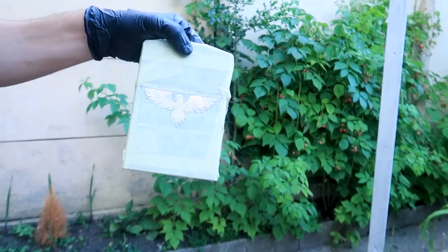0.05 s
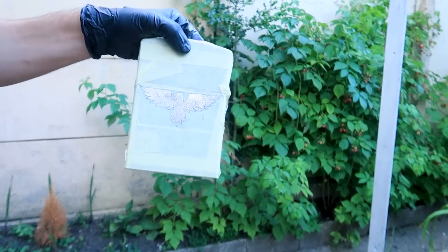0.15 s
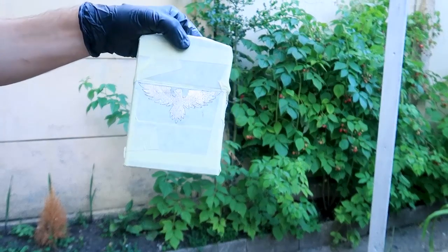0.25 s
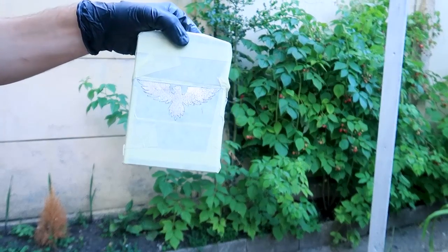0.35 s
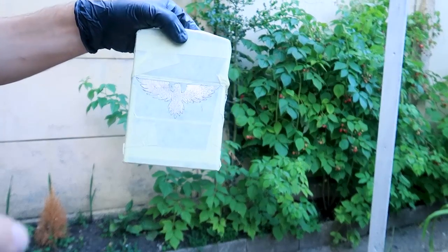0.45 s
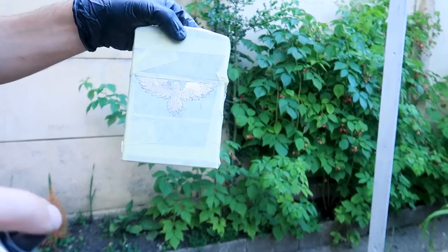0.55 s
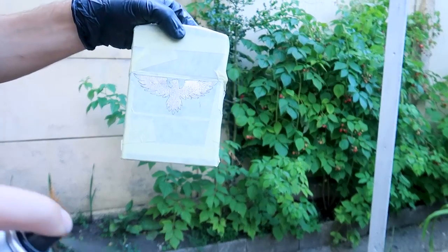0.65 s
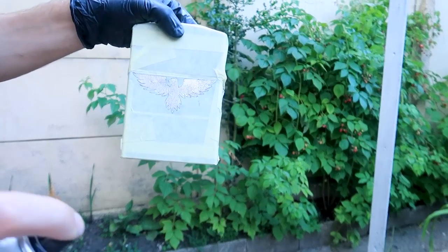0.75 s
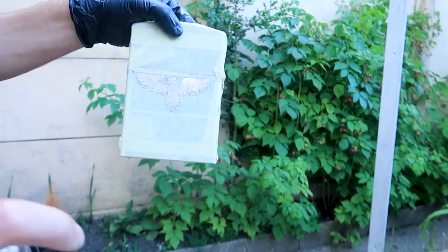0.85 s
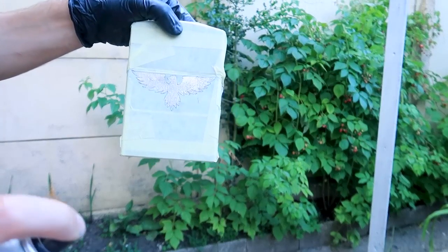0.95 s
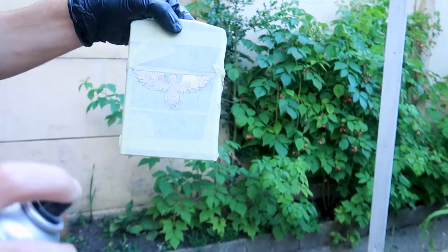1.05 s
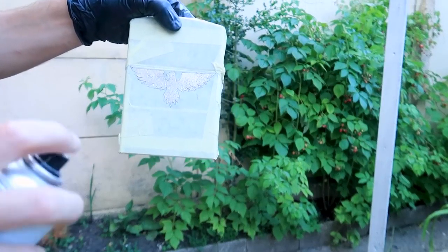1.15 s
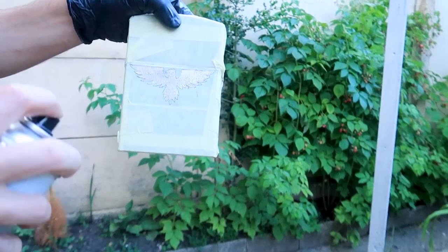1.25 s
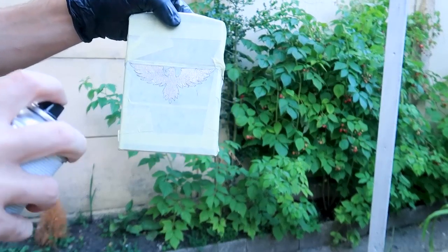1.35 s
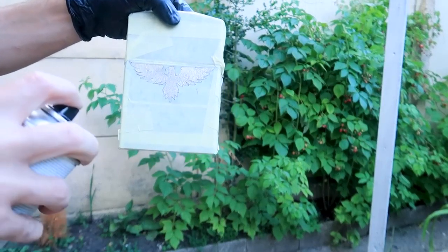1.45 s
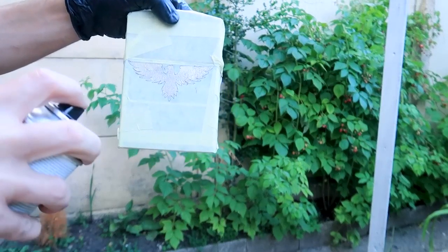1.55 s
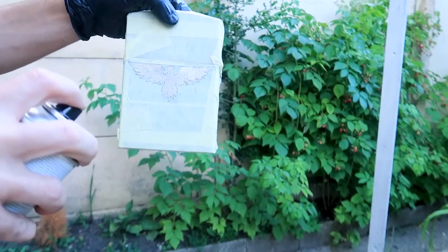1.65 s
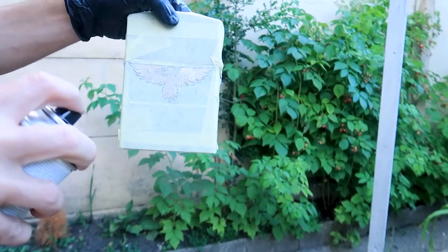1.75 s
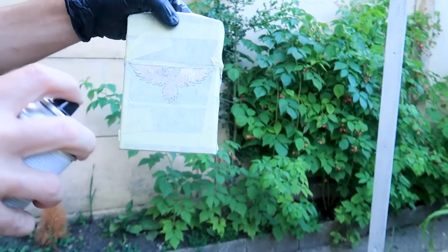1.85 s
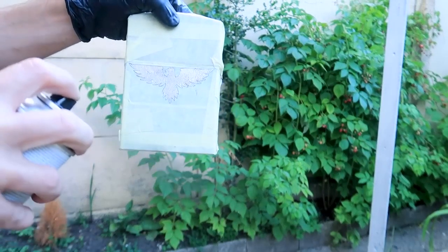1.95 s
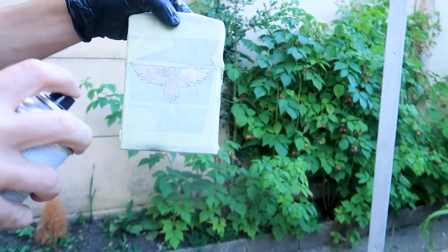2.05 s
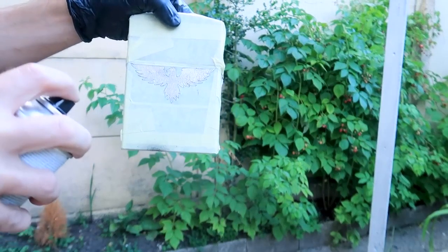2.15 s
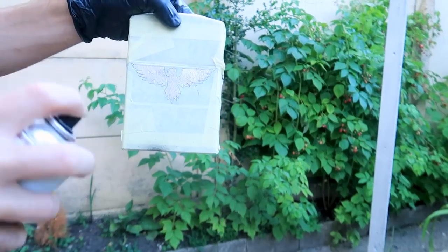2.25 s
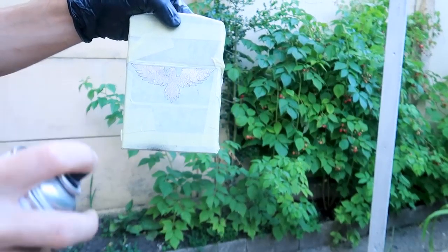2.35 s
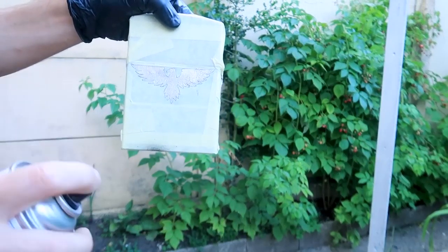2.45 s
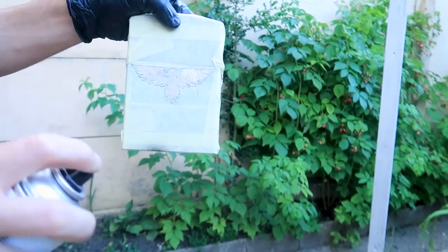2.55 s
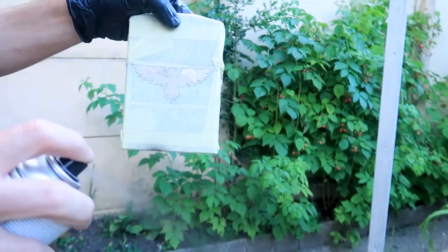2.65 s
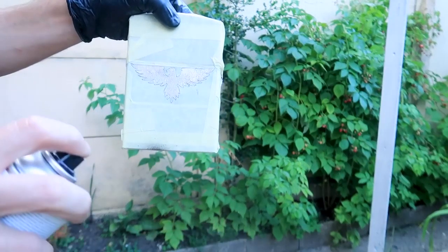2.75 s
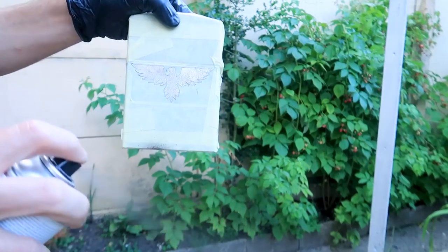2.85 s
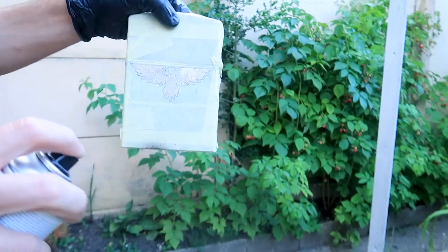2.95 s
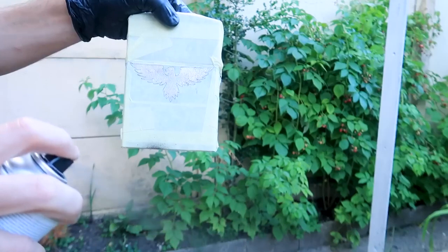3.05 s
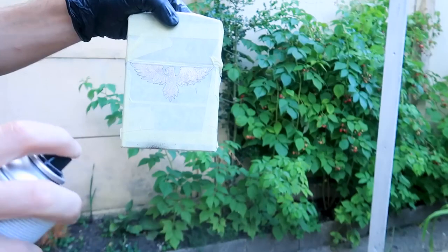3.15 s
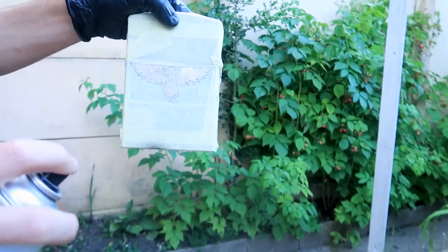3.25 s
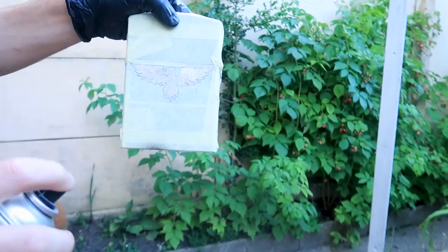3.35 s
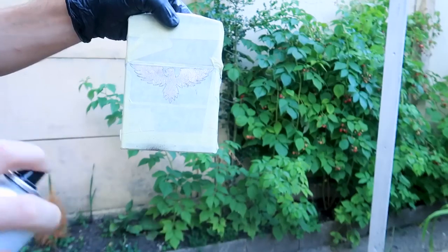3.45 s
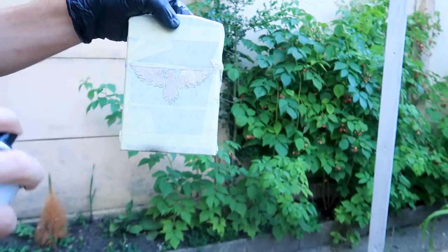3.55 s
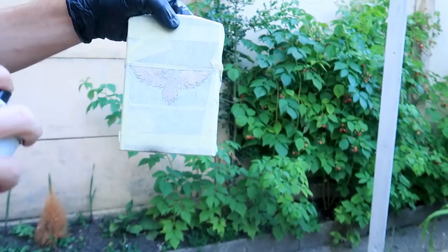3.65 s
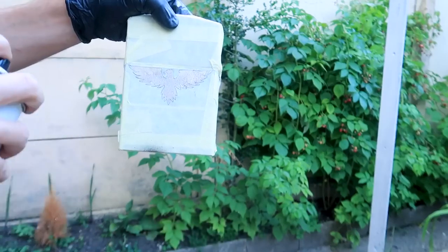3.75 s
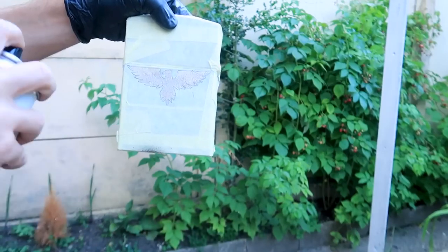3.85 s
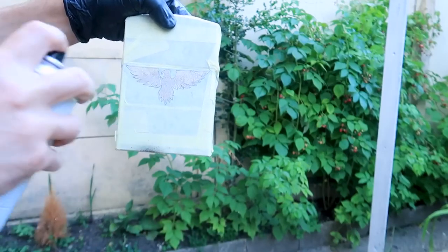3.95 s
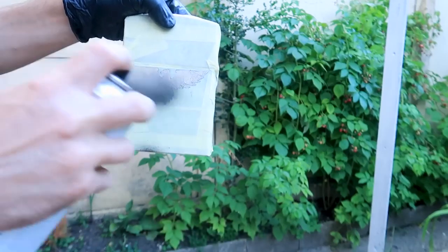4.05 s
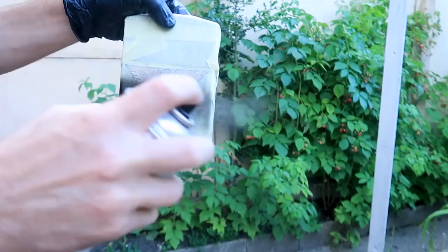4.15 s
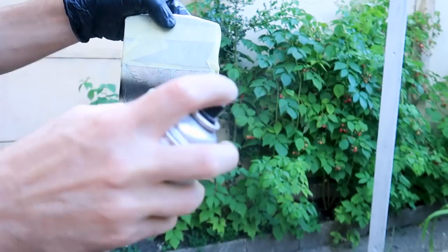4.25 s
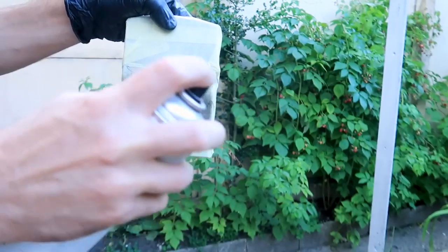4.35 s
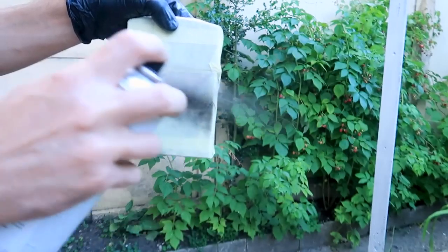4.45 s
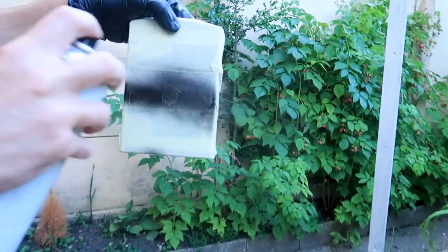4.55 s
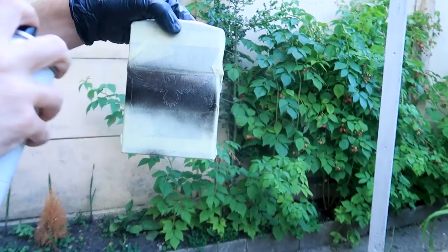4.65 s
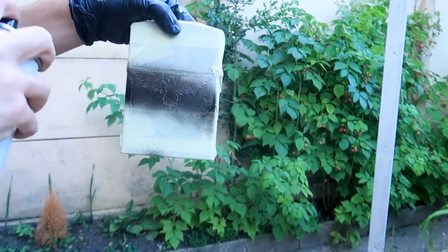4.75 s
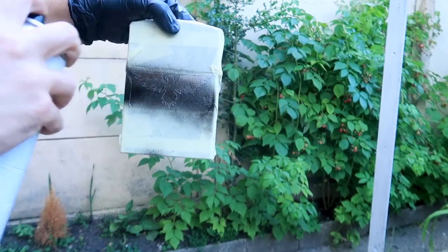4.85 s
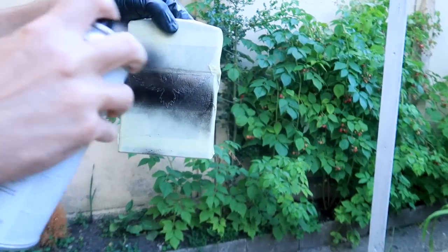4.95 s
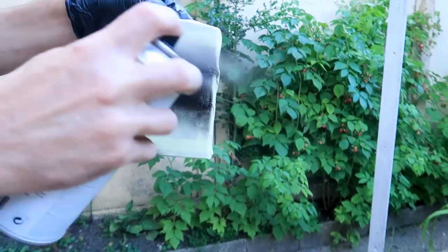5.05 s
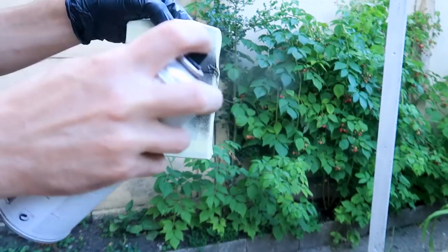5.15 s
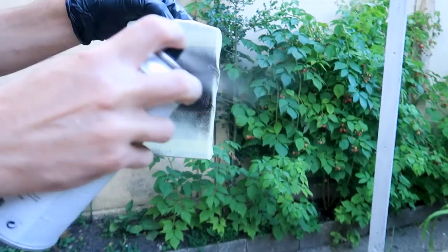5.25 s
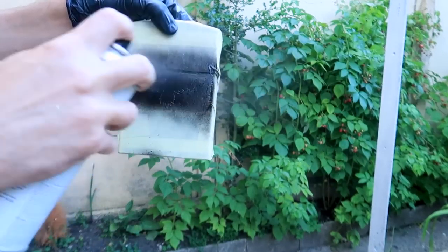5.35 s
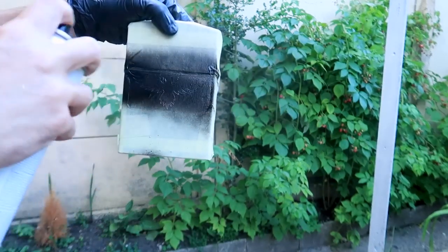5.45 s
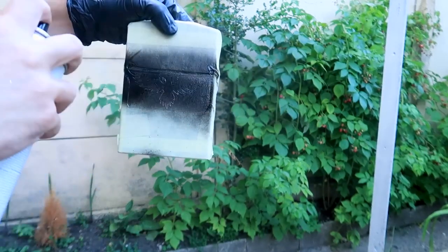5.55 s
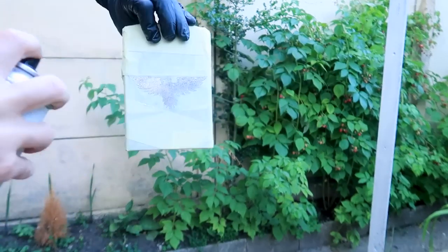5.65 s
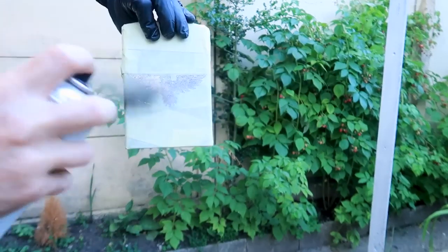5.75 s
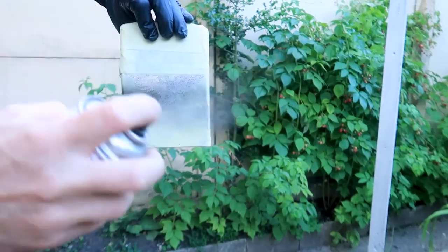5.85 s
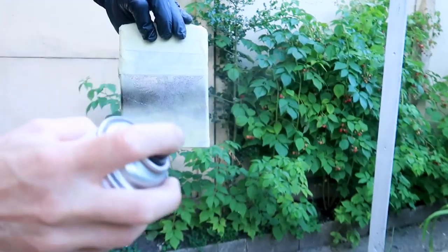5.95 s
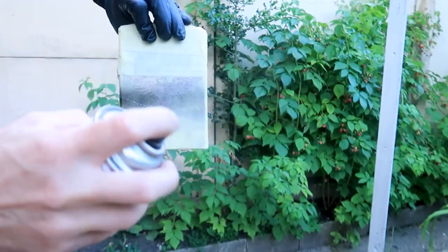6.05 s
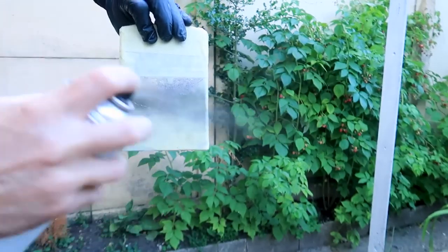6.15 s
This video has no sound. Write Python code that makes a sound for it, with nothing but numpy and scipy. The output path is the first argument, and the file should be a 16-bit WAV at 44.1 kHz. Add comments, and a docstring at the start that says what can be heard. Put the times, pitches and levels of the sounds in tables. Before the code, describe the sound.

Close dry crackles and rubs outdoors, then short wet hissing puffs from an aerosol can, followed by five longer spray bursts over faint traffic.

```python
"""Spray can in a walled garden

An aerosol can sprays paint onto a hand-held card: short trial puffs, then five passes to and fro.
Crackles and dry rubs sound close by as the can is raised; fainter rubs return during the passes.
Spray is shaped noise: wet sputter through a resonant nozzle, drying to a hiss, with a spit near closing.
In each pass a near reflection combs the hiss at a moving delay. Cracks are noisy clicks into ringing modes.
Behind: a short yard tail, outdoor rumble, distant traffic (wash and drone) and faint far whistles.
"""
import sys
import numpy as np
from scipy import signal
from scipy.fft import rfft, irfft
from scipy.io import wavfile
from scipy.ndimage import map_coordinates

SR = 44100
rng = np.random.default_rng(int(sys.argv[2]) if len(sys.argv) > 2 else 0)


def store_pcm(level_fs):
    """Save levels as 16-bit WAV."""
    pcm = np.round(np.clip(level_fs, -1, 1) * 32767).astype(np.int16)
    wavfile.write(sys.argv[1], SR, np.atleast_2d(pcm).T)


N = 273420
TIME_S = np.arange(N) / SR
FREQS_HZ = np.arange(N // 2 + 1) * SR / N

# Nozzle presses. Each row: opening in seconds, closing in seconds, time to open fully in seconds,
# initial hiss in dB, sputter before drying in dB, initial sizzle away from the front in dB, spit in dB,
# nozzle cavity in Hz, cavity strength in dB, reflection delay at the start in ms,
# sweep (1 delay grows, -1 delay shrinks, 0 held still).
PRESS_ROWS = [(0.78, 0.862, 0.013, -48.5, -43, -59, -43.5, 2330, -23, .49, 0),
              (0.983, 1.065, 0.01, -49.5, -44.5, -64, -52, 2510, 11.5, 1.11, 0),
              (1.656, 1.716, 0.01, -62.5, -64, -63, -80, 2265, 3, .73, 0),
              (1.831, 1.915, 0.056, -51.5, -47.5, -49.5, -59, 2540, 10, .75, 0),
              (2.044, 2.142, 0.036, -50, -45.5, -49.5, -61, 2370, -28, 1.0, 0),
              (2.746, 2.88, 0.025, -52.5, -47.5, -56, -49, 2280, -4, .88, 0),
              (2.94, 3.081, 0.023, -52.5, -47, -55, -54, 2290, 0, .88, 0),
              (3.11, 3.27, 0.027, -51.5, -47, -56, -51.5, 2270, 1, .88, 0),
              (4.082, 4.306, 0.024, -48, -46.5, -53.5, -46.5, 2250, -10.5, 0.545, 1),
              (4.548, 4.758, 0.019, -48, -44.5, -56, -52.5, 2340, 1.5, .89, -1),
              (5.02, 5.249, 0.028, -50.5, -46.5, -53, -47, 2350, -3.5, .57, 1),
              (5.379, 5.601, 0.016, -48, -45, -56, -53.5, 2290, 6, .84, -1),
              (5.834, 6.023, 0.022, -50, -46, -55.5, -47, 2260, 0.5, .81, 1)]
# Spray colour. Each row: frequency in Hz, relative density in dB per Hz.
SPRAY_COLOUR = [(900, -15), (1280, -6), (1650, -7.5), (2000, -4), (2350, -1.5), (2850, -9.5), (3700, -10.5),
                (5000, -10.5), (5800, -9), (7200, -15.5), (9500, -9), (11800, -3.5), (13500, -8),
                (15700, -15.5)]
# Closing spit colour. Each row: frequency in Hz, relative density in dB per Hz.
SPIT_COLOUR = [(350, -31), (750, -7), (1200, -7.5), (1900, -2), (2350, 1), (2900, -11), (5000, -12.5),
               (9000, -17), (15000, -37)]
# Dry cracks. Each row: start in seconds, energy in dB, own ring in Hz.
CRACK_ROWS = [(.402, -18, 2700), (0.4059, -10.5, 5970), (.4075, -12, 4000), (.429, -17.5, 5800),
              (0.4595, -15.5, 2780), (.466, -15, 2700), (0.4902, -14.5, 2800), (.516, -19, 2530),
              (.553, -19, 2830), (.596, -21.5, 2770), (0.7516, -1.5, 3850), (0.7608, -3, 3780),
              (.771, -11.5, 2100), (.787, -4.5, 3900), (0.797, -11, 3970), (.8199, -5, 3850),
              (0.8331, -1, 3820), (.8665, -15, 3920), (0.8708, -12.5, 4120), (.8928, -14.5, 3420),
              (.902, -10, 4080), (0.912, -16.5, 4000), (.930, -22.5, 3650), (.965, -18, 4180),
              (.9862, -20, 4850), (0.9939, -15, 4030)]
# Modes shared by all cracks. Each row: frequency in Hz, mean strength in dB, T60 in seconds.
SHARED_MODES = [(1155, -25, 0.014), (1920, -10, 0.0027), (2234, -18.5, 0.009), (3866, -15.5, 0.0091),
                (4630, -29, 0.015), (5830, -10, .010), (5950, -11, 0.0021), (7330, -4.5, 0.0034),
                (8710, -13.5, 0.012), (12100, -17.5, 0.007)]
# Friction colour. Each row: frequency in Hz, relative density in dB per Hz.
RUB_COLOUR = [(900, -23.5), (1600, -21), (2050, -2.5), (2550, -9.5), (3200, -7), (4300, -10), (5100, -10.5),
              (7000, -12), (9000, -31), (14000, -39.5)]
# Dry rubs as the arm moves. Each row: start in seconds, fullest in seconds, end in seconds,
# gain at the fullest in dB, resonance at full speed in Hz.
RUB_ROWS = [(0.371, 0.45, 0.68, -55.5, 2930), (0.559, 0.748, 1.1, -53.5, 3440),
            (0.926, 0.984, 1.01, -52, 4240), (4.875, 5.291, 5.41, -55.5, 3790),
            (5.634, 5.712, 5.73, -60, 4800), (6.086, 6.181, 6.24, -72, 4630)]
# Garden background colour. Each row: frequency in Hz, relative density in dB per Hz.
GARDEN_COLOUR = [(12, -31.5), (20, -1), (65, -4), (76, -12), (95, -14), (130, -15.5), (374, -20.5),
                 (495, -22.5), (731, -24), (1600, -31), (2430, -34), (2710, -37.5), (7210, -48),
                 (11300, -49), (15700, -63.5)]
# Garden stereo likeness. Each row: frequency in Hz, left-right correlation.
GARDEN_LIKENESS = [(60, .9998), (125, 1), (250, 0.77), (400, 0.85), (900, 0.84), (2500, 0.4), (6000, 0.092),
                   (14000, .1)]
# Traffic wash colour. Each row: frequency in Hz, relative density in dB per Hz.
WASH_COLOUR = [(400, -7.5), (750, 5), (1000, 7.5), (1300, 0), (2500, -16), (6000, -47)]
# Traffic wash. Each row: time in seconds, level in dB.
WASH_LEVELS = [(0, -70.5), (.22, -70), (.5, -79.5), (4.3, -80), (6.2, -91.5)]
# Traffic drone. Each row: time in seconds, level in dB.
DRONE_LEVELS = [(0, -81.5), (2.45, -66.5), (3.7, -75.5), (4.3, -66), (5.0, -68), (5.6, -83.5)]
# Far whistles, like a bird's. Each row: start in seconds, length in seconds, first pitch in Hz,
# last pitch in Hz, peak amplitude in dB.
WHISTLE_ROWS = [(3.23, 0.32, 2190, 2140, -79.5), (3.72, .07, 1974, 1985, -77.5),
                (3.819, 0.17, 2450, 2360, -78.5), (4.016, 0.13, 2086, 2070, -79)]

# unseal time, flow share released at once; closing decay; liquid arrives just after the gas
UNSEAL_S, UNSEAL_SHARE, SHUT_S, WETTING_S = 0.005, 0.25, 0.0095, 0.016
HISS_SAG_DB_PER_S, DRYING_DB_PER_S = 28, 68  # while a press is held
NOZZLE_WIDTH_HZ = 220
REFLECTION_GAIN, SECOND_REFLECTION_GAIN = 0.46, -0.15
SWEEP_MS, SWEEP_BOW_MS = 0.287, 0.038  # delay change over one pass, and its dip in mid-pass
FRONT_AT, FRONT_WIDTH = 0.57, 0.37  # shares of a pass: can in front of the microphone
FRONT_SIZZLE_DB = 4.5
SIDE_LEAD_US, FRONT_LEAD_US = 33.5, 14  # left-port lead of the gas, can aside and in front
CRUMBS_PER_S, CRUMB_DB, CRUMB_FADE_S = 220, -13, 0.02  # small random clicks after each crack
RUB_BEND, RUB_WIDTH_HZ, RUB_RING_DB = 0.17, 1600, -1.5  # bend: share the resonance drops at rest
YARD_T60_S, YARD_DB = 0.23, -17.5
GARDEN_DB, DRONE_HZ = -64.5, 59.1
CUTOFF_HZ = 15800


def spray(sputter_rough_db, hiss_rough_db, spread):
    """Turbulent gas hisses and sags; liquid lumps make the nozzle resonance flutter until it dries."""
    opens, closes, open_s, hiss_db, sputter_db, sizzle_db, spit_db, _, _, start_ms, sweep = latest_press()
    held_s = np.clip(TIME_S, opens, closes) - opens
    echo_ms, in_front = hand(held_s / (closes - opens), start_ms, sweep)
    lead_us = SIDE_LEAD_US + (FRONT_LEAD_US - SIDE_LEAD_US) * in_front
    flow, spit_shape = valve(opens, closes, open_s, spit_lead_s=0.0054, spit_s=0.012)
    colour = from_db(per_bin(SPRAY_COLOUR))
    lumps = drift(rate_hz=170)

    liquid = from_db(sputter_db - DRYING_DB_PER_S * held_s) * (1 - np.exp(-held_s / WETTING_S))
    spit_noise = noise(from_db(per_bin(SPIT_COLOUR)) * band(569.2, 14970))
    wet = liquid * sputter(colour, flow) + from_db(spit_db) * spit_shape * spit_noise
    wet *= rms_one(from_db(sputter_rough_db * lumps))

    surge = flow * rms_one(from_db(hiss_rough_db * lumps))
    hiss_gain = surge * from_db(hiss_db - HISS_SAG_DB_PER_S * held_s)
    sizzle_gain = surge * from_db(sizzle_db + FRONT_SIZZLE_DB * in_front)
    gas = hiss_gain * noise(colour * band(2810, 8460))
    gas += sizzle_gain * noise(colour * band(7310, 17000))

    # only the short waves bounce off surfaces as small as hand and card
    direct = ports(wet, 0.19 * lead_us, pan_db=-2.1)
    direct += ports(combed(gas, echo_ms), lead_us, pan_db=1.0)
    # the plume is wide, so part of its sizzle differs between the ports
    plume = spread * sizzle_gain * pair(colour * band(5900, 15900), alike=0)
    return direct + np.array([combed(side, echo_ms) for side in plume])


def latest_press():
    """At every sample, the columns of the press that began last (the first, before any)."""
    rows = np.array(PRESS_ROWS)
    return rows[np.maximum(np.searchsorted(rows[:, 0], TIME_S) - 1, 0)].T


def hand(progress, start_ms, sweep):
    """A pass slides the reflection delay (ms) and brings the can before the microphone (0-1)."""
    way = np.sign(np.round(sweep))
    bow_ms = abs(way) * SWEEP_BOW_MS * np.sin(np.pi * progress)
    echo_ms = start_ms + way * SWEEP_MS * progress - bow_ms
    in_front = abs(way) * np.exp(-((progress - FRONT_AT) / FRONT_WIDTH) ** 2)
    return echo_ms, in_front


def valve(opens, closes, open_s, spit_lead_s, spit_s):
    """The valve unseals, opens fully under the finger and springs shut; the spit peaks just before."""
    age_s = np.maximum(TIME_S - opens, 0)
    travel = UNSEAL_SHARE + (1 - UNSEAL_SHARE) * np.minimum(age_s / open_s, 1) ** 2
    shutting = np.exp(-np.clip((TIME_S - closes) / SHUT_S, 0, 20))
    flow = np.minimum(age_s / UNSEAL_S, 1) * travel * shutting
    spit_shape = np.exp(-np.minimum(np.abs((TIME_S - closes + spit_lead_s) / spit_s) ** 3, 20))
    return flow, spit_shape


def sputter(colour, flow):
    """Liquid breaks up in the nozzle; its cavity colours the noise differently at each press."""
    out = np.zeros(N)
    spectrum = rfft(rng.standard_normal(N)) * colour * band(887, 2990)
    for opens, *_, cavity_hz, cavity_db, _, _ in PRESS_ROWS:
        offset = (FREQS_HZ - cavity_hz) / (NOZZLE_WIDTH_HZ / 2)
        cavity = 1 + from_db(cavity_db) / (1 + offset ** 2)
        at = round(opens * SR)
        out[at:] = rms_one(irfft(spectrum * cavity, N))[at:]
    return out * flow


def combed(x, echo_ms, second_ms=0.07):
    """Two near reflections comb the gas noise; the comb slides as the delay moves."""
    first = delayed(x, echo_ms / 1000)
    second = delayed(x, (echo_ms + second_ms) / 1000)
    total = x + REFLECTION_GAIN * first + SECOND_REFLECTION_GAIN * second
    return total / np.linalg.norm([1, REFLECTION_GAIN, SECOND_REFLECTION_GAIN])


def crackle(ring_t60_s, ring_db, crumble_s, crumble_db, scatter_db, low_hz, high_hz):
    """Each crack is a snap and brief crumbling that excite its own pitch and the shared modes."""
    out, age_s = np.zeros(N), TIME_S[:SR // 10]
    small_body = signal.butter(2, [low_hz, min(high_hz, SR / 3)], "band", fs=SR, output="sos")
    for start_s, energy_db, hz in CRACK_ROWS:
        push = from_db(crumble_db) * rng.standard_normal(len(age_s)) * np.exp(-age_s / crumble_s)
        crumbs = (rng.random(len(age_s)) < CRUMBS_PER_S / SR) * rng.uniform(-1, 1, len(age_s))
        push += from_db(CRUMB_DB) * crumbs * np.exp(-age_s / CRUMB_FADE_S)
        push[0] += 1  # snap
        crack = from_db(ring_db) * ring(push, hz, ring_t60_s)
        for k, (mode_hz, mode_db, t60_s) in enumerate(SHARED_MODES):
            mode_gain = (-1) ** k * from_db(mode_db + rng.normal(0, scatter_db))
            crack += mode_gain * ring(push, mode_hz, t60_s)
        crack = signal.sosfilt(small_body, crack)
        at = round(start_s * SR)
        out[at:at + len(age_s)] += from_db(energy_db) * crack / np.linalg.norm(crack)
    return ports(out + rubbing(grains_per_s=350, grain_db=-3.5), lead_us=60.0, pan_db=2.0)


def rubbing(grains_per_s, grain_db):
    """Dry friction: rough hiss, tiny slips and a broad resonance that rises with the rub's speed."""
    colour = from_db(per_bin(RUB_COLOUR)) * band(800, 15640)
    slips = (rng.random(N) < grains_per_s / SR) * rng.standard_normal(N)
    grains = rms_one(irfft(rfft(slips) * colour, N))
    friction = noise(colour) + from_db(grain_db) * grains
    flutter = from_db(RUB_RING_DB) * np.sqrt(2) * drift(rate_hz=RUB_WIDTH_HZ / 2)
    out = np.zeros(N)
    for starts, fullest, ends, db, full_hz in RUB_ROWS:
        speed = np.interp(TIME_S, [starts, fullest, ends], [0, 1, 0])
        resonance = flutter * sine(full_hz * (1 - RUB_BEND * (1 - speed)))
        out += from_db(db) * speed * (friction + resonance)
    return out


def yard(x, dull_hz, onset_s, width):
    """Wall, ground and leaves scatter a short dull tail, partly different at each port."""
    age_s = TIME_S[:SR // 2]
    envelope = from_db(-60 * age_s / YARD_T60_S) * (1 - np.exp(-age_s / onset_s))
    mid, side = rng.standard_normal((2, len(age_s))) * envelope
    lowpass = signal.butter(2, min(dull_hz, SR / 3), fs=SR, output="sos")
    tail = signal.sosfilt(lowpass, mid + width * side * [[1], [-1]])
    tail /= np.sqrt(np.sum(tail ** 2, axis=1, keepdims=True))
    return from_db(YARD_DB) * signal.fftconvolve(x, tail, axes=1)[:, :N]


def garden():
    """Outdoor rumble, far traffic as a noise wash and a wavering sine drone, and far whistles."""
    air = from_db(GARDEN_DB) * pair(from_db(per_bin(GARDEN_COLOUR)), per_bin(GARDEN_LIKENESS))
    wash = level_gain(WASH_LEVELS) * pair(from_db(per_bin(WASH_COLOUR)), alike=0.65)
    drone = level_gain(DRONE_LEVELS) * np.sqrt(2) * sine(DRONE_HZ + 1.5 * drift(rate_hz=3.8))
    return air + wash + drone + whistles(waver_hz=8.1)


def whistles(waver_hz):
    """Thin far sine notes that glide a little and waver in pitch."""
    out, waver = np.zeros(N), waver_hz * drift(rate_hz=16)
    for starts, length_s, first_hz, last_hz, db in WHISTLE_ROWS:
        progress = np.clip((TIME_S - starts) / length_s, 0, 1)
        hz = last_hz + (first_hz - last_hz) * (1 - progress) ** 2 + waver
        envelope = np.sqrt(np.abs(np.sin(np.pi * progress)))
        out += from_db(db) * envelope * sine(hz)
    return out


def from_db(db):
    """Decibels to gain."""
    return 10 ** (np.asarray(db) / 20)


def rms_one(x):
    """Scale to unit power."""
    return x / np.sqrt(np.mean(x ** 2) + 1e-20)


def level_gain(rows):
    """Gain at every sample from rows of time and dB."""
    s, db = np.transpose(rows)
    return from_db(np.interp(TIME_S, s, db))


def per_bin(points):
    """A table over frequency, joined on a log axis."""
    hz, value = np.transpose(points)
    return np.interp(np.log(FREQS_HZ + 1), np.log(hz), value)


def noise(gain):
    """Unit-power noise shaped by a gain per frequency."""
    return rms_one(irfft(rfft(rng.standard_normal(N)) * gain, N))


def band(low_hz, high_hz):
    """Gain of a steep band-pass."""
    return ((1 + (low_hz / (FREQS_HZ + 1)) ** 12) * (1 + (FREQS_HZ / high_hz) ** 12)) ** -0.5


def drift(rate_hz):
    """Low-passed random motion of unit power."""
    return noise(1 / (1 + (FREQS_HZ / rate_hz) ** 2))


def pair(gain, alike):
    """Stereo noise with the given correlation between the sides."""
    alike = np.clip(alike, -1, 1)
    mid, side = rfft(rng.standard_normal((2, N))) * gain
    return rms_one(irfft(np.sqrt(1 + alike) * mid + np.sqrt(1 - alike) * side * [[1], [-1]], N))


def sine(hz):
    """Sine of height 1 that follows a pitch given at every sample."""
    return np.sin(2 * np.pi * np.cumsum(hz) / SR)


def delayed(x, seconds):
    """Read a signal through a moving delay."""
    return map_coordinates(x, [(TIME_S - seconds) * SR], order=3)


def ports(x, lead_us, pan_db):
    """The left port hears the source sooner by the lead, and louder by the pan (softer if negative)."""
    return np.array([x * from_db(pan_db / 2), delayed(x, lead_us / 1e6) * from_db(-pan_db / 2)])


def ring(x, hz, t60_s):
    """Two-pole resonator: a unit click starts a decaying sine of height 1."""
    r, w = from_db(-60 / (max(t60_s, 0.001) * SR)), 2 * np.pi * hz / SR
    return signal.lfilter([0, np.sin(w)], [1, -2 * r * np.cos(w), r * r], x + 1e-18)


def scene():
    """The near sounds, their yard tail and the garden."""
    near = spray(sputter_rough_db=2.0, hiss_rough_db=1.18, spread=0.45)
    near = near + crackle(ring_t60_s=0.0073, ring_db=1.0, crumble_s=0.0025, crumble_db=-16,
                          scatter_db=3.0, low_hz=817, high_hz=9600)
    return near + yard(near, dull_hz=6840, onset_s=0.004, width=0.3) + garden()


def record(dry):
    """The top is cut steeply by an elliptic low-pass."""
    return signal.sosfilt(signal.ellip(12, 0.1, 80, CUTOFF_HZ, fs=SR, output="sos"), dry)


dry = scene()
out = record(dry)
store_pcm(out)
```